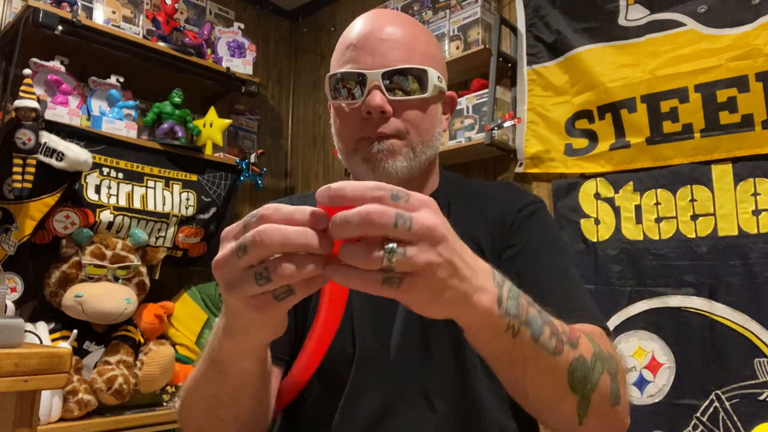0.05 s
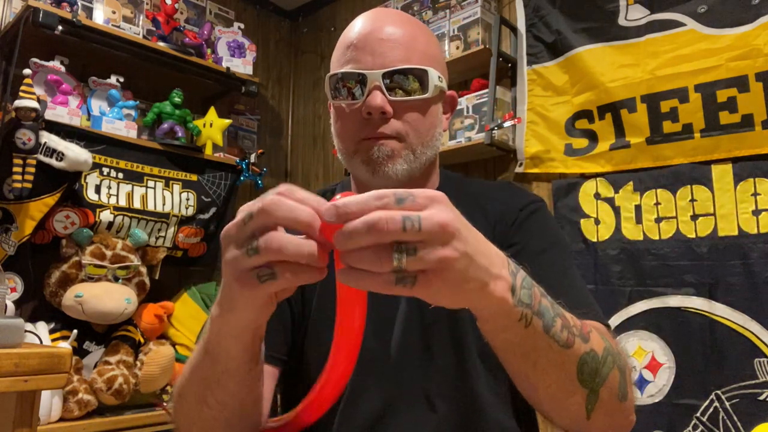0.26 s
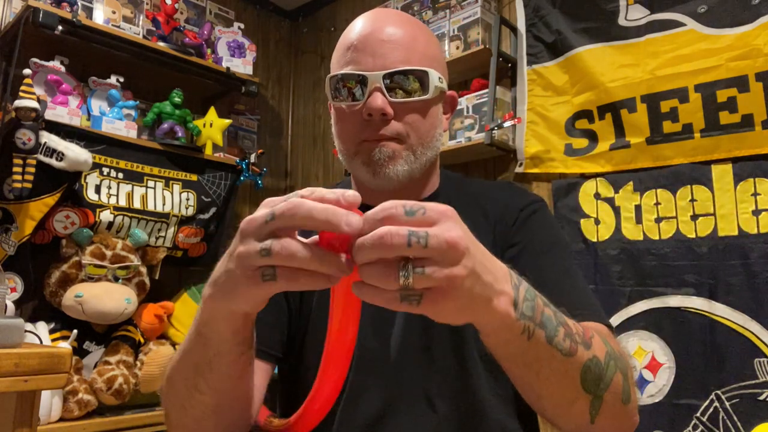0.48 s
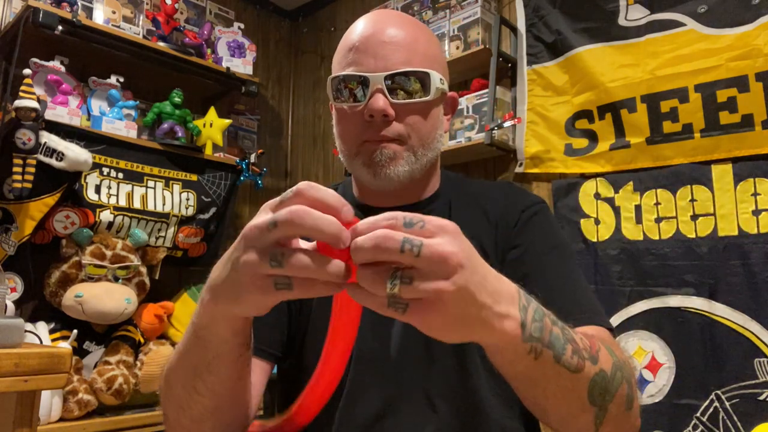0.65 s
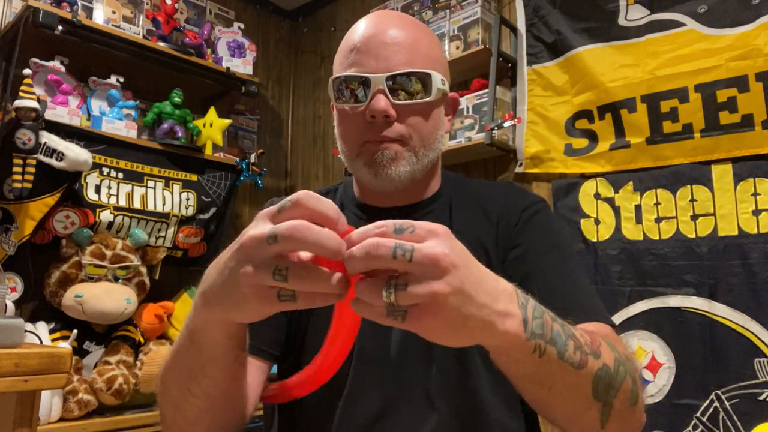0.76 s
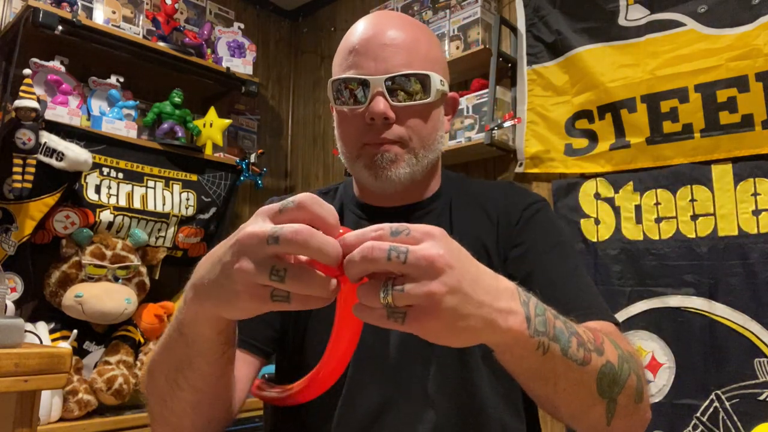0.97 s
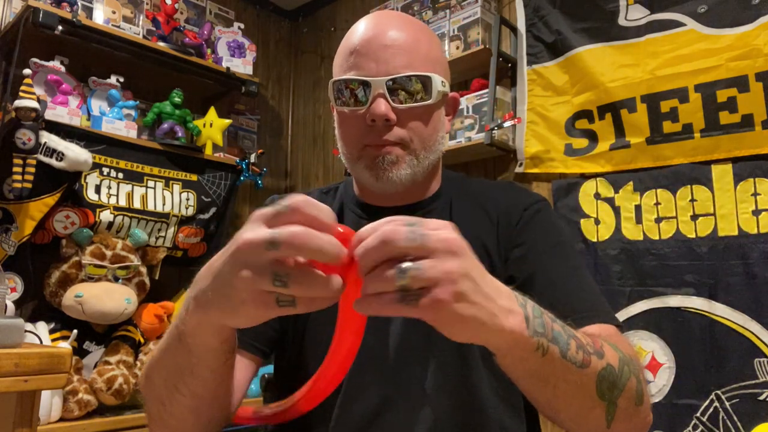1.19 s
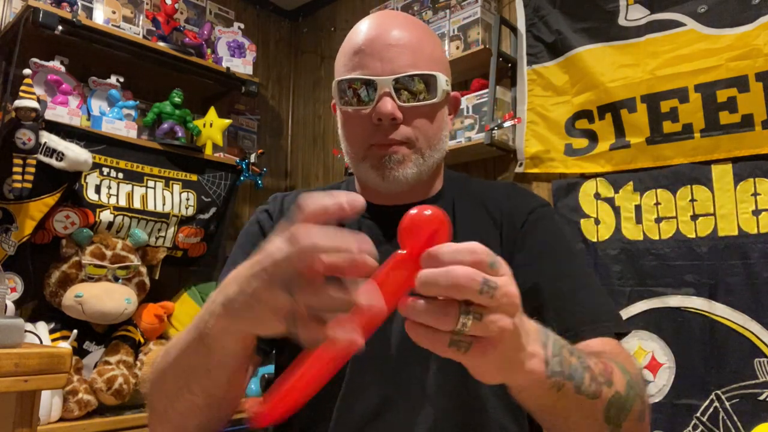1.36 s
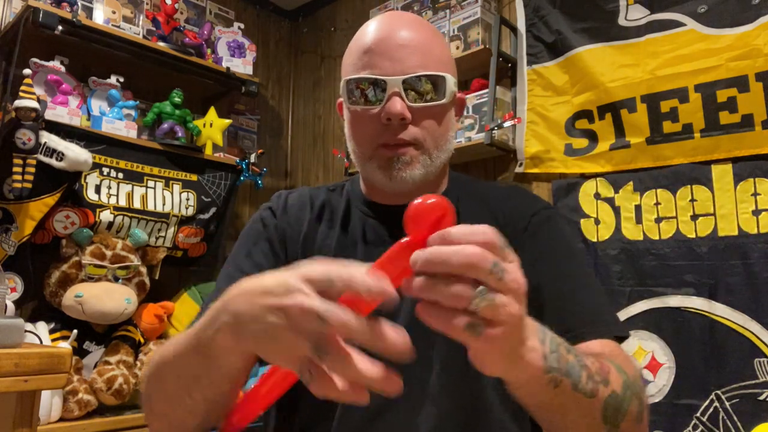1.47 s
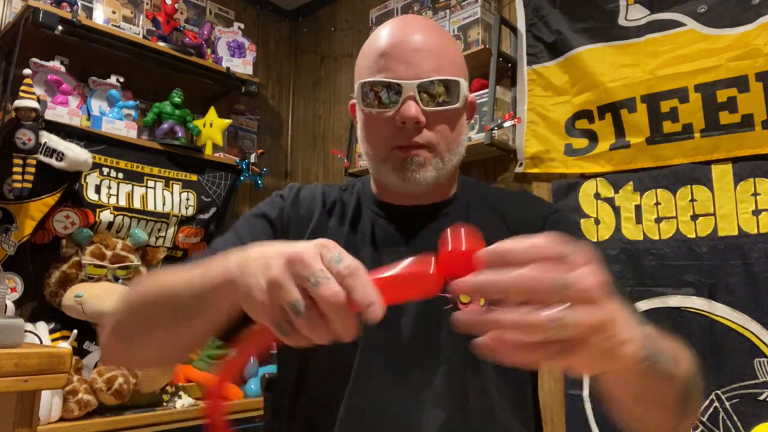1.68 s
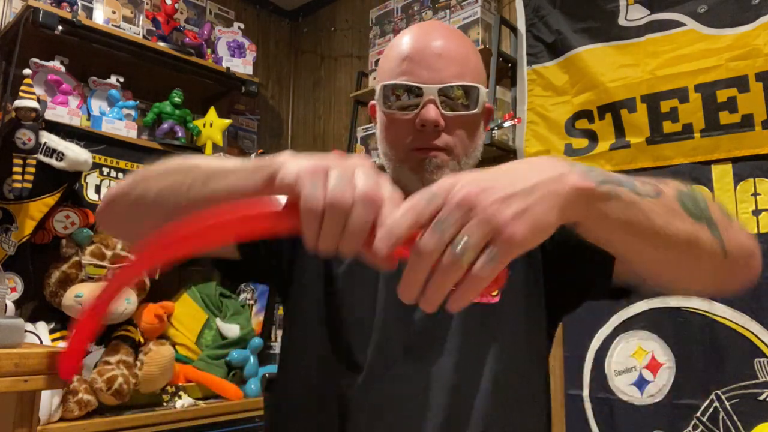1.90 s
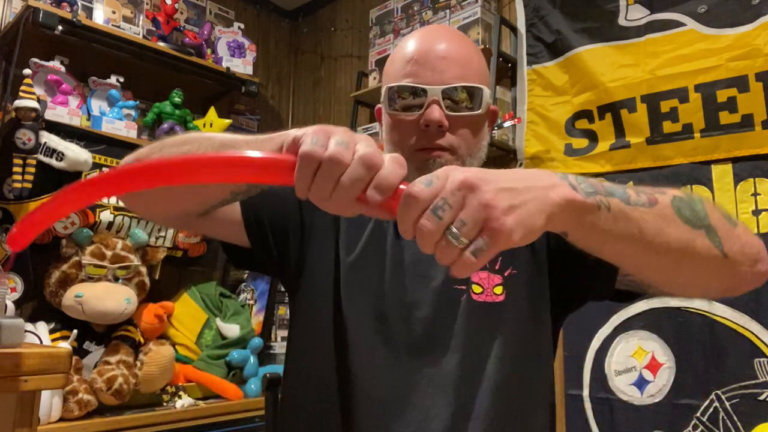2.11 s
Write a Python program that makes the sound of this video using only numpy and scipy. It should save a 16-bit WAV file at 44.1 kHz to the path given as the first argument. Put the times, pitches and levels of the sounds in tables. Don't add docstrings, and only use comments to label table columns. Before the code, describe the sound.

Fingers twist an inflated balloon: dry rubbery snaps and scuffs, one loud crack, then soft thumps

```python
import sys
import numpy as np
from scipy import signal
from scipy.fft import rfft, irfft, next_fast_len
from scipy.io import wavfile
from scipy.ndimage import uniform_filter1d, map_coordinates

SR = 44100
rng = np.random.default_rng(int(sys.argv[2]) if len(sys.argv) > 2 else 0)


def ratio_of_db(decibels):
    return 10 ** (np.asarray(decibels, float) / 20)


def generate_wav(sig):
    pcm = np.round(np.clip(np.atleast_2d(sig).T, -1, 1) * 32767).astype(np.int16)
    wavfile.write(sys.argv[1], SR, pcm)


N = 94506
SECONDS = np.arange(N) / SR
T = np.arange(SR // 4) / SR
POP_S = 1.4105


def unit(x):
    return x / np.sqrt(np.mean(x ** 2) + 1e-20)


def along(points, hz):
    f, v = np.transpose(points)
    return np.interp(np.log(hz + 1), np.log(f + 1), v)


def filtered(x, response):
    m = next_fast_len(N + 8192)
    return irfft(rfft(x, m) * response(np.fft.rfftfreq(m, 1 / SR)), m)[..., :N]


def noise(tone, channels=1):
    white = rng.standard_normal((channels, N))
    return unit(filtered(white, lambda hz: ratio_of_db(along(tone, hz))))


def wobble(rate_hz):
    knots = rng.standard_normal(int(N * rate_hz / SR) + 4)
    return map_coordinates(knots, [SECONDS * rate_hz])


def add(out, start_s, x):
    part = out[round(start_s * SR):][:len(x)]
    part += x[:len(part)]


def fade(t, t60_s, attack_s):
    return ratio_of_db(-60 * t / t60_s) * (1 - np.exp(-t / attack_s))


def bursts(table, width_oct, attack_s, lead_db):
    out = np.zeros(N)
    t = T[:4096] - .005
    f = np.fft.rfftfreq(4096, 1 / SR)
    for start_s, db, hz, t60_s in table:
        band = (f < 15500) / (1 + (np.log2((f + 1) / hz) / width_oct) ** 4)
        lead_in = ratio_of_db(lead_db - 60 * abs(t) / 0.012)
        shape = fade(np.maximum(t, 0), t60_s, attack_s) + lead_in
        z = rfft(shape * rng.standard_normal(len(t)))
        burst = irfft(z * band / uniform_filter1d(abs(z), size=70))
        level = ratio_of_db(db - 1.5) * np.linalg.norm(shape) / np.linalg.norm(burst)
        add(out, start_s + t[0], level * burst)
    return out


# (frequency [Hz], correlation [0-1])
LIKENESS = [(60, .85), (300, .5), (3000, .5), (6000, .7), (7500, 1), (16000, 1)]


def spread(pair):
    def mid_side(hz):
        turn = np.arccos(along(LIKENESS, hz)) / 2
        return np.array([np.cos(turn), np.sin(turn)])

    mid, side = filtered(pair, mid_side)
    return np.array([mid + side, mid - side])


# (frequency [Hz], level [dB])
HUM_TONE = [(12, -49), (25, -16), (55, -4), (109, 5), (188, -13.5), (374, -14), (659, -18), (1510, -21),
            (2500, -38), (5500, -120)]


def hum():
    return ratio_of_db(-51.5 + 1.5 * wobble(8)) * spread(noise(HUM_TONE, channels=2))


# (frequency [Hz], t60 [s])
ROOM_T60 = [(200, 0.42), (1500, 0.2), (5000, 0.2), (14000, 0.1)]


def room(x):
    tail_db, desk_s, desk_db = -11, 0.0071, -13
    hz, t, z = signal.stft(rng.standard_normal((2, SR // 2)), SR, nperseg=256)
    decay = ratio_of_db(-60 * t / along(ROOM_T60, hz)[:, None])
    tail = signal.istft(z * decay, SR, nperseg=256)[1]
    tail = tail / np.linalg.norm(tail[0])
    late = np.pad(x, (150, 0))[None]
    wet = signal.fftconvolve(late, tail, axes=1)[:, :N]
    return ratio_of_db(tail_db) * spread(wet) + ratio_of_db(desk_db) * np.roll(x, round(desk_s * SR))


# (time [s], level [dB])
SWING_LEVEL = [(1.4, -82), (1.416, -17.5), (1.448, -43.5), (1.52, -52), (1.65, -49), (1.69, -46.5),
               (1.8, -63), (1.97, -41), (2.05, -71)]
# (frequency [Hz], level [dB])
SWING_TONE = [(35, -34), (80, -3), (130, -3.5), (300, -13), (700, -42)]


def swing():
    level_db = np.interp(SECONDS, *np.transpose(SWING_LEVEL), left=-120) + 3 * wobble(30)
    return ratio_of_db(level_db + [[-2.5], [2.5]]) * spread(noise(SWING_TONE, channels=2))


# (time [s], level [dB])
RUB_LEVEL = [(0, -52.5), (.2, -50.5), (.43, -52.5), (.47, -63), (.51, -70), (.53, -53.5), (.9, -49),
             (.97, -55), (1.17, -51), (1.31, -51), (1.35, -55.5), (1.52, -52), (1.59, -56), (1.728, -52.5),
             (1.779, -61.5), (1.86, -51), (2.03, -49.5), (2.14, -51)]
# (frequency [Hz], level [dB])
RUB_TONE = [(500, 1.5), (1400, 0.5), (3000, 2), (6000, -1), (9000, -5.5), (13500, -5.5), (14600, -16),
            (15200, -40)]


def rub():
    whir_hz, whir_low_hz, sag_s = 1485, 1360, 1.25
    whir_width_hz, whir_db = 81, -8.5
    centres_hz = np.array([[whir_hz], [whir_low_hz]])
    white = rng.standard_normal((1, N))
    high, low = filtered(white, lambda hz: 1 / (1 + ((hz - centres_hz) / whir_width_hz) ** 2))
    whir = unit(np.where(SECONDS < sag_s, high, low))
    hiss = ratio_of_db(2.2 * wobble(25) + 2.5 * wobble(200)) * spread(noise(RUB_TONE, channels=2))
    level_db = np.interp(SECONDS, *np.transpose(RUB_LEVEL))
    return ratio_of_db(level_db) * (hiss + ratio_of_db(whir_db + 2.9 * wobble(7.76)) * whir)


# (time [s], peak level [dB], centre [Hz], t60 [s])
KNOCKS = [(.548, -38.5, 500, 0.048), (1.26, -38, 950, 0.067), (1.412, -16, 257, 0.073),
          (1.48, -30, 148, 0.092), (1.55, -32.5, 450, 0.054), (1.615, -34, 550, 0.048),
          (.228, -37.5, 400, 0.043), (1.47, -35, 650, 0.097), (1.668, -25, 520, 0.045),
          (1.682, -30.5, 300, 0.067), (1.693, -33.5, 800, 0.039), (1.945, -31, 250, 0.058),
          (2.046, -36.5, 500, 0.082), (1.877, -25.5, 380, 0.062), (1.92, -34, 450, 0.082),
          (1.962, -31, 750, 0.072), (1.997, -34, 600, 0.064)]


def knocks():
    return bursts(KNOCKS, width_oct=1.0, attack_s=0.0029, lead_db=-19)


# (frequency [Hz], level [dB], t60 [s], unsteadiness [rad])
TUBE_MODES = [(120, -5.5, 0.075, .3), (195, -0.5, 0.095, .2), (365.5, 3, 0.098, 0.23),
              (413.6, 0, 0.095, 0.34), (503, -7, 0.092, 0.37), (761, -9, 0.086, 0.49),
              (940, 2.5, 0.057, 0.54), (2004, -16, .2, .25), (2012, -18, .22, .25)]


def tube():
    pop_db = -14.5
    out = np.zeros(N)
    for hz, db, t60_s, unsteady_rad in TUBE_MODES:
        phase = 2 * np.pi * hz * T + unsteady_rad * wobble(108)[:len(T)]
        add(out, POP_S, ratio_of_db(pop_db + db) * fade(T, t60_s, 0.0016) * np.sin(phase))
    return out


# (frequency [Hz], level [dB])
SKIN_TONE = [(500, -7), (1800, 6), (4000, -1.5), (15000, -11)]


def swell():
    swell_s, swell_db = 0.0053, -19.5
    out = np.zeros(N)
    rise = ratio_of_db(swell_db - 8.7 * T[::-1] / swell_s)
    add(out, POP_S - T[-1], rise * noise(SKIN_TONE)[0, :len(T)])
    return out


# (time [s], peak level [dB], centre [Hz], t60 [s])
CRACK = [
    (1.408, -15, 1980, 0.026),
    (1.4105, -10, 2730, 0.021),
    (1.418, -25, 2200, 0.11),
    (1.418, -34, 8000, 0.091),
]


def crack():
    return bursts(CRACK, width_oct=1.1, attack_s=.0006, lead_db=-20)


# (time [s], peak level [dB], pitch [Hz], ring length [s])
PLUCKS = [(.365, -15.5, 985, 0.0043), (0.8536, -19, 1400, 0.0018), (.8535, -27, 3400, .002),
          (.228, -22, 2750, .0015), (.228, -26, 1150, .0015), (1.4095, -17, 2900, .0025),
          (.982, -38, 2500, .003), (1.1, -38, 970, .012), (1.005, -18.5, 1600, 0.0017),
          (1.4093, -11.5, 1552, 0.0036), (0.371, -27.5, 900, 0.0044), (0.387, -39, 830, .004),
          (0.393, -37.5, 1020, 0.0046), (0.42, -40, 795, 0.0036), (1.263, -38.5, 922, 0.0046),
          (1.271, -38, 1350, .003), (1.4163, -12, 231, 0.0045), (1.554, -33.5, 416, .006),
          (1.877, -38, 2110, .012), (1.878, -33.5, 373, 0.01), (0.365, -25.5, 2510, .003),
          (.8535, -25, 2650, .002), (1.004, -26.5, 3550, .002), (1.668, -34, 854, .006),
          (1.961, -31, 853, 0.0039)]


def plucks():
    out = np.zeros(N)
    for start_s, db, hz, length_s in PLUCKS:
        shape = (1 - np.exp(-T / .0004)) * np.exp(-(T / length_s) ** 2 / 2)
        add(out, start_s, ratio_of_db(db) * shape * np.sin(2 * np.pi * hz * T * (1 - 3 * T)))
    return out


# (start [s], end [s], slip rate [1/s], level [dB], centre [Hz])
CREAKS = [
    (0.382, 0.417, 340, -47, 3000),
    (1.03, 1.048, 190, -37.5, 2770),
    (1.386, 1.39, 600, -51, 2520),
    (1.885, 2.001, 125, -36.5, 1150),
]


def creaks():
    slips = []
    for start_s, end_s, rate_hz, db, hz in CREAKS:
        for i, (late, size, colour) in enumerate(rng.standard_normal((20, 3))):
            slip_s = start_s + (i + .12 * late) / rate_hz
            if slip_s <= end_s:
                slips.append((slip_s, db + 2 * size, hz * 1.25 ** colour, .011))
    return bursts(slips, width_oct=1.1, attack_s=.0004, lead_db=-30)


# (time [s], peak level [dB], centre [Hz], t60 [s])
SCUFFS = [(.031, -25.5, 4000, 0.014), (.228, -13.5, 2830, 0.0095), (.3655, -18.5, 2300, 0.018),
          (.394, -30, 3700, 0.0067), (.411, -33, 2420, 0.023), (.543, -39, 1960, 0.02),
          (1.862, -41, 1430, .03), (.524, -41, 1420, 0.019), (.568, -36.5, 1880, 0.017),
          (1.617, -41.5, 1600, 0.017), (1.685, -36, 1480, 0.026), (2.062, -39, 1490, .04),
          (.64, -47, 3940, 0.01), (.664, -33.5, 4000, 0.013), (.733, -37.5, 3640, 0.031),
          (.8535, -15, 3370, 0.017), (.939, -32.5, 2670, 0.014), (.982, -30, 2670, 0.02),
          (1.004, -21, 3080, 0.014), (1.1015, -24.5, 3500, 0.011), (1.1165, -23.5, 3720, 0.012),
          (1.1235, -28.5, 2460, 0.013), (1.13, -26, 3300, 0.0074), (1.1355, -26, 3540, .01),
          (1.1405, -26, 3020, .012), (1.146, -34.5, 2820, 0.009), (1.152, -34, 2570, 0.017),
          (1.199, -32, 3100, 0.058), (1.257, -28.5, 2750, 0.02), (1.272, -31, 2010, 0.02),
          (1.285, -34.5, 2050, 0.016), (1.367, -39, 2500, .02), (1.376, -31.5, 1960, 0.015),
          (1.551, -40, 1780, 0.02), (1.654, -31, 2500, 0.017), (1.669, -19.5, 2100, 0.01),
          (1.877, -34.5, 1760, 0.02), (2.043, -24, 2240, 0.023), (2.124, -48, 3440, .013)]


def scuffs():
    return bursts(SCUFFS, width_oct=0.99, attack_s=0.00039, lead_db=-15.5)


# (time [s], peak level [dB], centre [Hz], t60 [s])
SNAPS = [(.031, -26, 8500, 0.013), (.163, -43, 8000, 0.0076), (.187, -42, 8400, .02),
         (.2274, -13, 7800, 0.0069), (.3355, -30.5, 8500, 0.0049), (.348, -32, 8000, .006),
         (.3652, -28, 8660, 0.0085), (.3935, -19.5, 12100, 0.006), (.4232, -28.5, 10000, 0.0057),
         (.4955, -36, 8000, 0.0061), (.52, -38, 8000, 0.0075), (.64, -29, 9200, 0.016),
         (.6525, -30.5, 9000, 0.0062), (.664, -28, 9100, 0.013), (.757, -34.5, 9000, 0.0095),
         (.787, -28, 7440, 0.0077), (.853, -12.5, 9050, 0.0079), (.92, -37, 9000, 0.0051),
         (1.0035, -31, 8000, 0.0049), (1.101, -19, 9000, 0.013), (1.1165, -22.5, 11100, 0.0051),
         (1.257, -20, 9000, 0.0085), (1.272, -25, 9100, 0.0065), (1.285, -28.5, 10100, 0.0064),
         (1.376, -32.5, 9000, 0.007), (1.41, -7.5, 9000, 0.0095), (1.6535, -34, 8440, 0.011),
         (1.667, -18, 9200, 0.0092), (2.043, -24, 7800, 0.011)]


def snaps():
    return bursts(SNAPS, width_oct=1.0, attack_s=0.000077, lead_db=-16)


# (frequency [Hz], width [Hz], level [dB])
WALL_MODES = [(1350, 320, 3), (2620, 161, 2.5), (4450, 420, 0), (8246, 330, 1)]


def wall(x):
    def response(f):
        total = 1
        for hz, width_hz, db in WALL_MODES:
            damping = 1j * f * width_hz
            total = total + ratio_of_db(db) * damping / (hz * hz - f * f + damping)
        return total

    return ratio_of_db(-3) * filtered(x, response)


def scene():
    rough = wall(snaps() + scuffs() + creaks()) + knocks() + crack()
    clear = plucks() + tube() + swell()
    direct = (rough + clear) * ratio_of_db([[-.4], [.4]])
    echo = room(rough + .2 * clear)
    return direct + echo + swing() + rub() + hum()


def roll_off(x):
    return signal.sosfilt(signal.butter(12, 16530, fs=SR, output="sos"), x)


# (frequency [Hz], level [dB])
MIC_TONE = [(2000, -1), (2800, 2.5), (5800, -0.5), (8200, -0.5), (10400, 1), (12500, 0)]
# (frequency [Hz], lead of left over right [rad])
PORT_LEAD = [(0, 0), (1000, -1.1), (1900, -.6), (2600, -2.1), (5600, -2.3), (8000, 0), (10500, np.pi),
             (16500, 3.4 * np.pi)]


def record(dry):
    ceiling = .9
    hz, lead_rad = np.transpose(PORT_LEAD)
    sides = np.array([[1], [-1]])

    def ports(f):
        return ratio_of_db(along(MIC_TONE, f)) * np.exp(.5j * np.interp(f, hz, lead_rad) * sides)

    x = filtered(dry, ports)
    x = x / (1 + abs(x / ceiling) ** 4) ** .25
    return roll_off(filtered(x, lambda f: f < 16550))


dry = scene()
out = record(dry)
generate_wav(out)
```